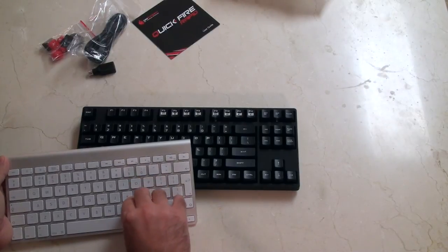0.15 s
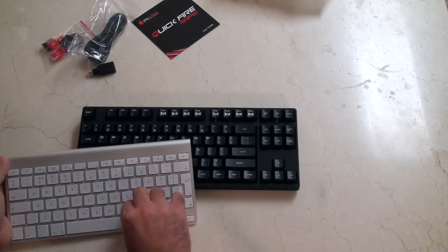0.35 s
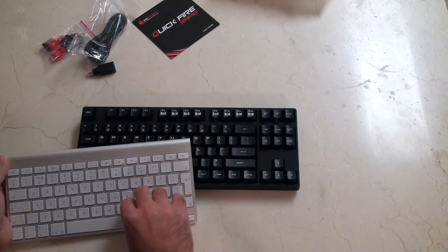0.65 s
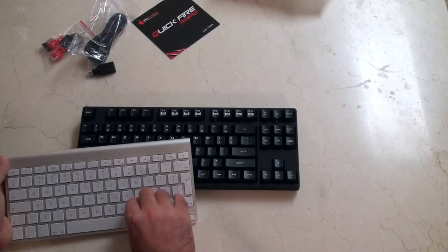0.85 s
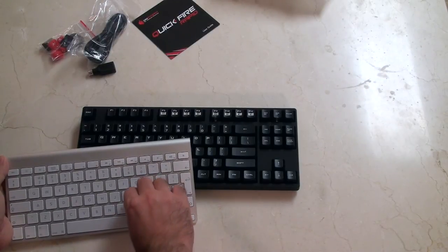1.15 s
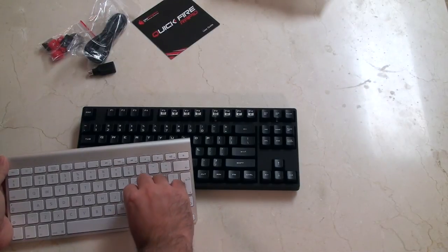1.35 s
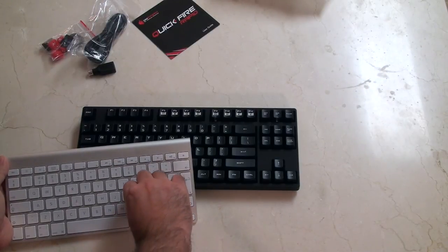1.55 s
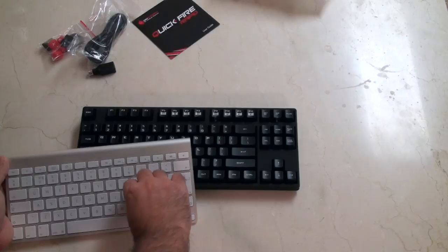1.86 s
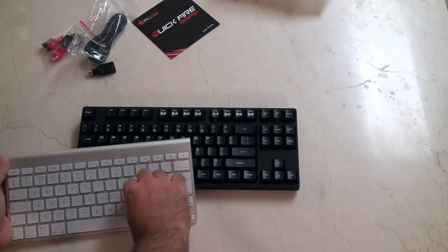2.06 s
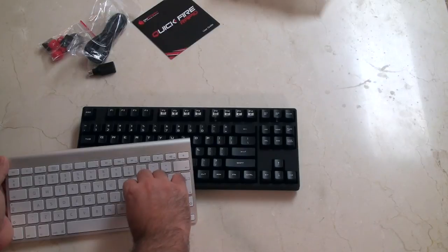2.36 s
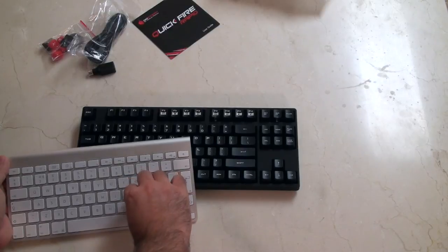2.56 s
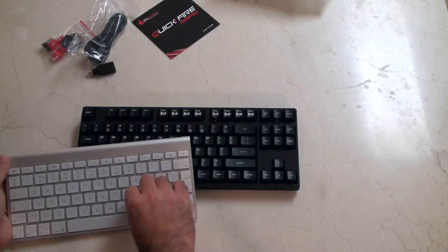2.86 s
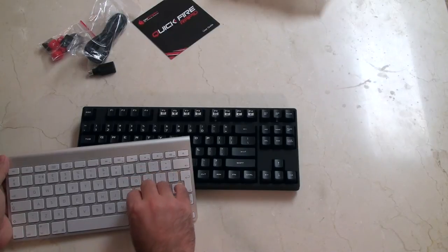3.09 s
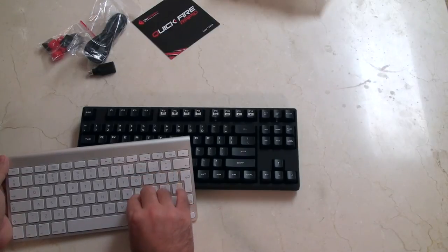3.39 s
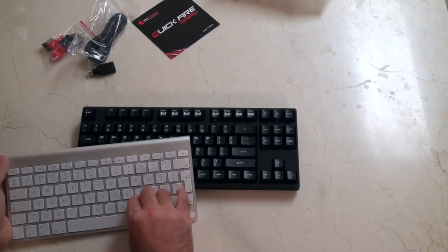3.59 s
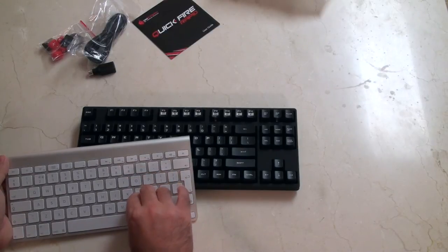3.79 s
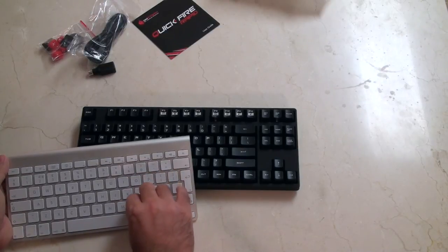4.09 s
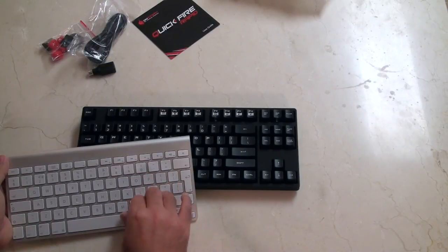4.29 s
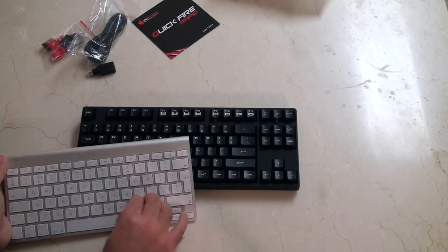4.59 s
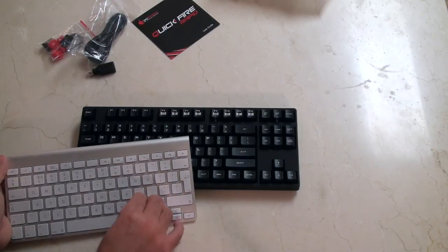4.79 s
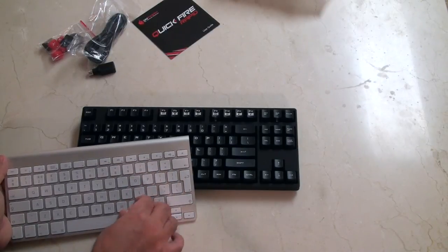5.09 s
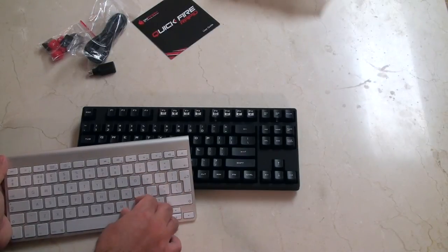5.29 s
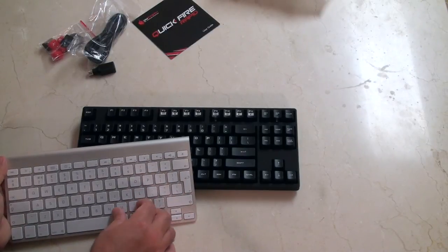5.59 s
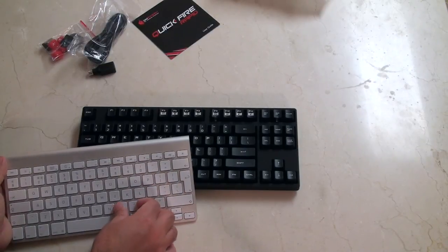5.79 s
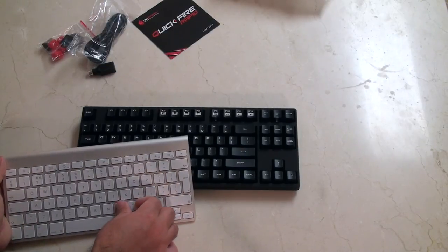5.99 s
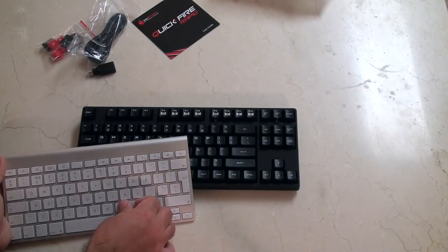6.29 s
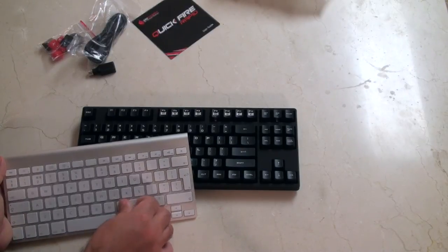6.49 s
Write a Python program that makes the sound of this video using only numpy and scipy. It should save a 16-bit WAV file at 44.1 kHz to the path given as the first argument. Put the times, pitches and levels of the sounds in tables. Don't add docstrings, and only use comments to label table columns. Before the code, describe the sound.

A quiet hard-surfaced room with a soft, low ventilation hum, miked close. After a barely audible tick, a nail snaps off a thin plastic keycap at about 0.43 s: a loud bright crack with a hinge rattle and several hollow case knocks. A crisp click follows at 0.66, smaller ones at 0.88 and 1.23, each with a short echo. Then near quiet, with only a tiny knock at 1.5 and a faint brush at 2.05. A strong, sharp snap lands at 2.6, another duller one at 3.2 amid quick ticks, and a softer release at 3.93. From 4 to 5.8 s come scattered light ticks, small squeaks and rim scrapes, with a brighter tick at 5.44, while fingertips scuff faintly over the keys. After a lull, a final clear snap sounds at 6.44 and a hard double tick at 6.59.

```python
import sys
import numpy as np
from scipy import signal
from scipy.fft import rfft, irfft, next_fast_len
from scipy.io import wavfile
from scipy.ndimage import uniform_filter1d, map_coordinates

SR = 44100
rng = np.random.default_rng(int(sys.argv[2]) if len(sys.argv) > 2 else 0)


def file_out(sig):
    cols = np.atleast_2d(sig).T
    lim = np.clip(cols, -1, 1)
    pcm = np.round(lim * 32767).astype(np.int16)
    wavfile.write(sys.argv[1], SR, pcm)


def elevation(decibels):
    levels = np.asarray(decibels, float)
    return 10 ** (levels / 20)


N = 293265

# (time [s], peak level [dB], cap ring [Hz], edge level [dB])
NAIL_TICKS = [(0.028, -38.5, 6100, -37.5), (0.658, -11.5, 5200, -16), (0.6726, -17, 5170, 11),
              (0.8765, -23, 5140, -26.5), (0.8831, -22, 6200, 4), (1.2296, -25, 6450, -15),
              (1.241, -25.5, 5470, -22.5), (2.8942, -31.5, 6220, -21), (3.19, -31, 4570, -10),
              (3.212, -18.5, 6300, -28), (3.2348, -12.5, 6600, -25), (3.255, -12, 6000, -30),
              (3.6273, -23, 9480, -6.5), (3.7563, -46, 4510, -35), (3.8394, -53.5, 4540, -21),
              (4.018, -20, 5570, -28.5), (4.2829, -32, 4860, -0.5), (4.5007, -32.5, 4560, 2),
              (4.509, -19.5, 5080, -19), (4.6333, -34, 6430, -13), (4.912, -37, 7800, -21),
              (4.9224, -18.5, 5400, -24), (5.1632, -20, 7740, -23), (5.43, -28.5, 6900, 5),
              (5.4441, -10, 9840, -3), (5.5405, -32.5, 4880, -11), (5.7766, -41, 4440, -25.5),
              (6.3383, -34, 5520, -42), (6.59, -10.5, 5320, -29), (6.594, -10, 6400, -2)]
# (time [s], peak level [dB], cap ring [Hz], edge level [dB], key plate level [dB])
RELEASES = [
    (0.435, 1.5, 5503, -9.5, 1.5),
    (2.612, 1.5, 6530, 2.5, -9.5),
    (3.2051, -1, 5810, -23, -17.5),
    (3.9284, -12, 5920, 3, -10.5),
    (6.4376, -3, 6160, 2, -24.5),
]
# (time offset [s], level [dB])
CATCHES = [
    (-.017, -30.5),
    (-.009, -26),
    (.022, -10.5),
]


def ticks(lanes):
    t = np.arange(SR // 40) / SR
    catches = [(s + ds, db + loss_db, *tone) for s, db, *tone in RELEASES for ds, loss_db in CATCHES]
    flicks = [(*row, -20.5) for row in NAIL_TICKS]
    for k, (s, db, hz, edge_db, key_db) in enumerate(RELEASES + catches + flicks):
        cap = cluster(hz, 0.11, 26 / hz, t)
        snap = elevation(-21 - 60 * t / 0.0033) * np.diff(rng.standard_normal(len(t) + 1))
        edge = elevation(edge_db) * cluster(13200, 0.1, 0.003, t)
        key = elevation(key_db) * cluster(1950, 0.1, 0.003, t)
        add(lanes, k, s, elevation(db + 7.0) * (cap + snap + edge + key))


# (resonance [Hz], width [Hz], level [dB])
CASE_MODES = [(857, 150, 5.5), (1320, 900, -6.5)]
# (resonance [Hz], width [Hz], level [dB])
KEY_MODES = [(1880, 970, -4.5), (2920, 2200, -5.5), (4070, 1200, -0.5)]
# (resonance [Hz], width [Hz], level [dB])
CAP_MODES = [(5348, 1300, -7.5), (6700, 310, 7), (8160, 10000, -6.5)]
# (resonance [Hz], width [Hz], level [dB])
EDGE_MODES = [(11500, 4500, -0.5), (14200, 1100, -1)]
# (time [s], peak level [dB], case level [dB], key level [dB], edge level [dB])
RATTLING_SLIPS = [(0.4201, -13.5, -3, -3.5, -23), (0.4694, -22.5, 6.5, 0.5, -27),
                  (0.6579, -35, 7.5, -6.5, 7.5), (1.2236, -35, 5, -12, -2.5), (2.5952, -14.5, -8, -2, 2.5),
                  (3.1961, -23.5, -19, -22.5, -16.5), (3.9141, -18.5, -12, -31, -9),
                  (4.0094, -40.5, -6, 5, -35.5), (4.6194, -38, -12.5, -14, -22),
                  (5.1609, -28.5, -15, -8.5, -25.5), (6.4127, -17.5, -16.5, -8.5, -6.5),
                  (6.5945, -28.5, -23.5, -22, 7.5)]


def slips(lanes):
    t = np.arange(SR // 5) / SR
    light_swell_s, hard_swell_s = 0.0098, 0.022
    for k, (s, db, case_db, key_db, edge_db) in enumerate(RATTLING_SLIPS):
        hard = 1 / (1 + np.exp(-22.5 - db))
        u = t / (light_swell_s + hard * (hard_swell_s - light_swell_s))
        levels_db = (0, case_db + 4.0, key_db + 1.0, edge_db)
        hail = np.zeros(len(t))
        for modes, part_db in zip((CAP_MODES, CASE_MODES, KEY_MODES, EDGE_MODES), levels_db):
            contacts = rng.standard_normal(len(t)) * elevation(2.5 * rng.exponential(size=len(t)))
            hail += elevation(part_db) * unit(filtered(contacts, body(modes)))
        add(lanes, k + 2, s, elevation(db - 6.5) * hail * u * np.exp(1 - u))


# (time [s], peak level [dB], case ring [Hz], overtone level [dB])
CASE_KNOCKS = [(0.42, -35, 940, -34), (0.436, -9.5, 906, 3.5), (0.447, -10.5, 1183, 7),
               (0.46, -11.5, 900, -2), (0.489, -12.5, 1000, 4.5), (0.663, -21, 930, 4),
               (0.876, -24, 980, -3), (1.225, -30.5, 908, 5.5), (1.24, -26.5, 903, -5),
               (1.482, -34, 956, -25.5), (2.588, -35.5, 1000, -6.5), (2.608, -23, 933, -24),
               (2.64, -27.5, 927, 11), (2.953, -50.5, 923, -6), (3.189, -40.5, 936, -1),
               (3.756, -59, 988, 4), (3.915, -45, 784, 11), (3.939, -33, 882, 15.5),
               (4.005, -33, 1043, 9.5), (4.031, -31, 1000, -0.5), (4.272, -38.5, 965, -2),
               (4.5, -28.5, 952, -10), (4.614, -50, 914, -3), (4.908, -33.5, 953, -10),
               (4.922, -30.5, 914, -2), (5.161, -41.5, 910, 4), (5.836, -53.5, 900, -10),
               (6.34, -45, 1000, 10), (6.41, -39.5, 930, 11), (6.447, -32, 954, 11)]


def knocks(lanes):
    t = np.arange(SR // 10) / SR
    for k, (s, db, hz, over_db) in enumerate(CASE_KNOCKS):
        note = ring(hz, 0.025, t, 0.0005) + 0.4 * cluster(1.1 * hz, 0.17, 0.005, t)
        overtone = elevation(over_db + 1.0) * cluster(1.9 * hz, 0.068, 0.0059, t)
        add(lanes, k, s, elevation(db + 11.0) * (note + overtone))


# (time [s], peak level [dB], resonance [Hz])
PLATE_CREAKS = [(0.44, -19.5, 1501), (2.6141, -27.5, 2000), (3.0694, -62.5, 2090), (3.195, -38.5, 2518),
                (3.225, -42.5, 4260), (4.5003, -49.5, 1900), (5.4326, -42.5, 1950), (5.58, -55, 2120),
                (5.62, -57, 2160), (1.224, -44, 1664), (5.8252, -62.5, 1880)]
# (time [s], peak level [dB], resonance [Hz])
SIDE_RASPS = [(0.6624, -36.5, 4360), (0.8774, -31, 4860), (1.2346, -38, 5583), (4.2827, -37, 5370),
              (4.4194, -46, 5430), (4.5002, -34, 4670), (4.9212, -37, 5300), (4.96, -42.5, 4960),
              (5.1654, -34, 6000), (5.4296, -41, 5050), (5.7748, -48, 4770), (6.3385, -46, 1750)]
# (time [s], peak level [dB], resonance [Hz])
TOP_SQUEAKS = [(0.02, -56, 6800), (0.6664, -26, 5890), (0.8796, -37, 7360), (1.2347, -36.5, 7170),
               (1.483, -60, 7380), (2.61, -25, 6700), (2.8944, -48.5, 6370), (3.2056, -21, 6060),
               (3.235, -33, 6800), (4.5071, -38.5, 7000), (4.7754, -51.5, 6800), (4.9101, -48.5, 7700),
               (5.4355, -38, 7350), (5.8845, -53, 7500), (6.4398, -24, 6100)]
# (time [s], peak level [dB], resonance [Hz])
RIM_HISSES = [
    (0.8844, -36.5, 9300),
    (2.0477, -49, 9460),
    (3.6267, -43, 9780),
    (4.2877, -36, 9820),
    (4.4189, -48.5, 9960),
    (4.4996, -33.5, 10040),
    (4.5953, -45, 12710),
    (4.9218, -44.5, 9300),
    (5.4441, -28.5, 9400),
    (5.7759, -55, 8740),
]


def rubs(lanes):
    t = np.arange(SR // 6) / SR
    kinds = ((PLATE_CREAKS, 0.013), (SIDE_RASPS, 0.0025), (TOP_SQUEAKS, 0.0052), (RIM_HISSES, 0.0026))
    events = [(*row, swell_s) for rows, swell_s in kinds for row in rows]
    for k, (s, db, hz, swell_s) in enumerate(events):
        resonance = body([(hz, 0.17 * hz, 0)])
        rasp = unit(filtered(rng.standard_normal(len(t)), lambda f: resonance(f) ** 2))
        u = t / swell_s
        add(lanes, k, s, elevation(db - 2.5) * rasp * u * np.exp(1 - u))


# (time [s], level [dB])
DRAG_EFFORT = [(0, -92), (.4, -76.5), (0.801, -67.5), (1.1, -69.5), (1.4, -80), (1.6, -100.5), (2.5, -86),
               (2.85, -63), (3.1, -71.5), (4.15, -72), (4.4, -69), (4.75, -67.5), (5.1, -61.5),
               (5.3, -69.5), (5.5, -63), (5.8, -72.5), (6.1, -102.5), (6.65, -86.5)]
# (frequency [Hz], density [dB per Hz])
SKIN_COLOUR = [(1500, -120), (2000, -4), (3200, -8), (5000, 0.5), (8000, -7), (10700, -18), (13500, -16.5),
               (15200, -48)]


def scuff():
    drag_db = np.interp(np.arange(N) / SR, *np.transpose(DRAG_EFFORT))
    grain = rng.standard_normal((2, N)) * elevation(2 * wobble(300) + 1.5 * wobble(18))
    ragged = patchy(grain, patch_db=2.8)
    hiss = unit(filtered(ragged, lambda hz: elevation(along(SKIN_COLOUR, hz))))
    hiss = elevation(-74 + 0.9 * (drag_db + 72.5)) * hiss
    dull = body([(1300, 1800, 0)])
    rub = elevation(drag_db - 2.0) * unit(filtered(grain, lambda hz: dull(hz) ** 2))
    return spread(*(hiss + rub))


# (frequency [Hz], density [dB per Hz])
RUMBLE_COLOUR = [(12, -69.5), (20, -27.5), (145, -12), (192, -7), (286, -9), (403, -3.5), (513, -6),
                 (600, -8), (780, -40), (1320, -120)]
# (frequency [Hz], density [dB per Hz])
AIR_COLOUR = [(180, -51), (300, -26), (409, -5.5), (515, -15.5), (559, -9), (750, -15.5), (898, -22.5),
              (1400, -43.5), (1700, -20), (1940, -25.5), (2250, -26), (4470, -33), (8800, -41),
              (10800, -50), (13200, -42), (15000, -45)]
# (resonance [Hz], width [Hz], level [dB])
DUCT_TONES = [(210, 20, -11.5), (452, 75, -10), (559, 16, 8)]


def ventilation():
    drag_db = np.interp(np.arange(N) / SR, *np.transpose(DRAG_EFFORT))
    swell_db = 1.2 * wobble(3) + 2 * wobble(9)
    low = lambda hz: elevation(along(RUMBLE_COLOUR, hz)) / (1 + (hz / 420) ** 4)
    rumble = unit(filtered(rng.standard_normal((2, N)), low))
    rumble = elevation(swell_db - 65 + 0.15 * (drag_db + 73)) * rumble
    airy = lambda hz: elevation(along(AIR_COLOUR, hz)) / (1 + (hz / 14900) ** 30)
    air = elevation(-65 + 1.0 * wobble(6)) * unit(filtered(rng.standard_normal((2, N)), airy))
    ducts = elevation(-67.5 + 2.4 * wobble(7)) * unit(filtered(rng.standard_normal((2, N)), body(DUCT_TONES)))
    return spread(*(rumble + air + ducts))


# (frequency [Hz], t60 [s], echo level [dB])
ROOM_DECAY = [(500, .7, -5.5), (1000, 0.7, -5.5), (2500, 0.43, 3.5), (6000, 0.63, -3.5),
              (10000, 0.66, -6.5), (15000, 0.25, -2)]
# (delay [s], level [dB])
NEAR_WALLS = [
    (.0045, -3),
    (.013, -8.5),
    (0.025, -18.5),
    (.039, -19),
]
TAILS = 4


def room(lanes):
    hz, t, z = signal.stft(rng.standard_normal((TAILS, 2, SR // 3)), SR, nperseg=256)
    fall_db = 60 * (t / along(ROOM_DECAY, hz)[:, None]) + 260 * t ** 2
    tail = signal.istft(z * elevation(-fall_db), SR, nperseg=256)[1]
    time = np.arange(tail.shape[-1]) / SR
    walls = sum(elevation(db + 15.5) * np.exp(-((time - delay) / 0.00052) ** 2) for delay, db in NEAR_WALLS)
    tail = tail * (1 - np.exp(-time / 0.0096) + walls)
    tail = tail / np.linalg.norm(tail, axis=-1, keepdims=True)
    tail = filtered(tail, lambda f: elevation(along(ROOM_DECAY, f, column=2)))
    early = np.exp(-(time / 0.045) ** 2)
    m = next_fast_len(lanes.shape[-1] + len(time))
    source = rfft(lanes, m)[:, None]

    def echo(part):
        return spread(*irfft((source * rfft(part, m)).sum(axis=0), m)[:, :N])

    late = suppressor(patchy(echo(tail * (1 - early)), patch_db=2.5))
    return lanes.sum(axis=0)[:N] + echo(tail * early) + late


# (frequency [Hz], level [dB per bin])
CLOSING_LEVEL = [(300, -71.5), (900, -60), (2500, -74.5), (6000, -71), (10000, -69.5), (15000, -70)]


def suppressor(x):
    hz, t, z = signal.stft(x, SR, nperseg=512)
    power = np.mean(np.abs(z) ** 2, axis=0)
    power = np.abs(uniform_filter1d(uniform_filter1d(power, size=15, axis=0), size=5, axis=1))
    shut = elevation(along(CLOSING_LEVEL, hz))[:, None] ** 2
    return signal.istft(z * (power / (power + shut)) ** 1.5, SR, nperseg=512)[1][:, :N]


def patchy(x, patch_db):
    z = signal.stft(x, nperseg=512)[2]
    field = uniform_filter1d(uniform_filter1d(rng.standard_normal(z.shape[1:]), size=7, axis=0), size=10, axis=1)
    return signal.istft(z * elevation(patch_db * unit(field)), nperseg=512)[1][:, :N]


# (frequency [Hz], side minus mid [dB])
STEREO_WIDTH = [(60, -20), (200, -14), (700, -9.5), (2400, -9), (8000, -5), (10800, -5), (12500, -14),
                (14000, -30)]


def spread(mid, side):
    side = filtered(side, lambda hz: elevation(along(STEREO_WIDTH, hz)))
    return np.array([mid + side, mid - side])


def cluster(hz, scatter, t60, t):
    total = np.zeros(len(t))
    for detune, level, sign in rng.standard_normal((6, 3)):
        mode = ring(hz * (1 + scatter * np.clip(detune, -2, 2)), t60, t)
        total += elevation(2 * level - 8.0) * np.sign(sign) * mode
    return total


def ring(hz, t60, t, rise=0.0009):
    return np.sin(2 * np.pi * hz * t) * elevation(-60 * t / t60) * (1 - np.exp(-t / rise))


def body(modes):
    def response(f):
        total = 0
        for k, (c, w, db) in enumerate(modes):
            total = total + (-1) ** k * elevation(db) * 1j * f * w / (c * c - f * f + 1j * f * w)
        return total
    return response


def add(lanes, k, s, sound):
    lanes[k % TAILS, round(s * SR):][:len(sound)] += sound


def wobble(rate):
    return map_coordinates(rng.standard_normal(int(N * rate / SR) + 4), [np.arange(N) * rate / SR])


def unit(x):
    return x / np.sqrt(np.mean(x ** 2) + 1e-20)


def along(points, hz, column=1):
    table = np.transpose(points)
    return np.interp(np.log(hz + 1), np.log(table[0] + 1), table[column])


def filtered(x, response):
    m = next_fast_len(x.shape[-1] + 8192)
    return irfft(rfft(x, m) * response(np.fft.rfftfreq(m, 1 / SR)), m)[..., :x.shape[-1]]


# (frequency [Hz], level [dB])
MIC_COLOUR = [(150, -28), (350, -4), (700, -1.5), (2400, -1.5), (3100, -1.5), (4200, -2.5), (8500, 0),
              (10700, -11), (12500, -6.5), (15500, -4)]


def scene():
    lanes = np.zeros((TAILS, N + SR // 2))
    for add_source in (ticks, slips, knocks, rubs):
        add_source(lanes)
    lanes = filtered(elevation(-5.5) * lanes, lambda hz: elevation(along(MIC_COLOUR, hz)))
    return room(lanes) + scuff() + ventilation()


def roll_off(x):
    return signal.sosfilt(signal.butter(12, 16650, fs=SR, output="sos"), x)


def record(dry):
    rounded = dry / (1 + np.abs(dry / 0.6) ** 4) ** (1 / 4)
    treble = lambda hz: (1 - np.tanh((hz - 15750) / 90)) / 2
    bass = lambda hz: hz ** 3 / (hz ** 3 + 55 ** 3)
    mix = filtered(rounded, lambda hz: treble(hz) * bass(hz))
    return roll_off(mix)


dry = scene()
out = record(dry)
file_out(out)
```